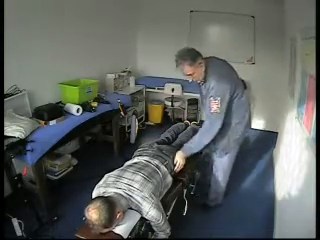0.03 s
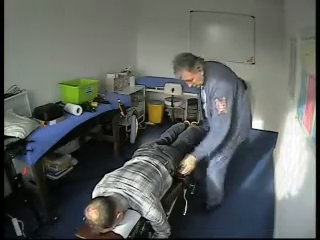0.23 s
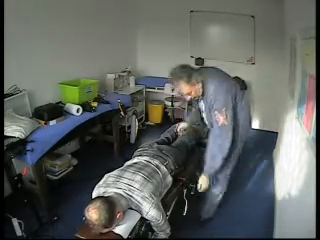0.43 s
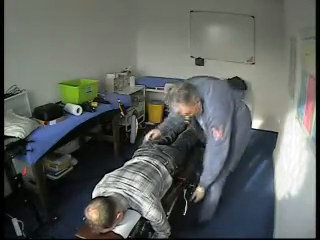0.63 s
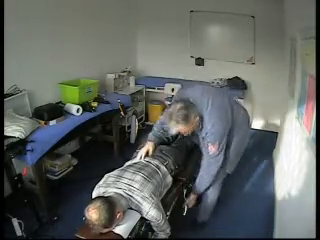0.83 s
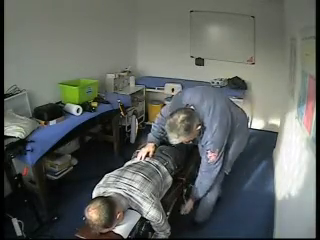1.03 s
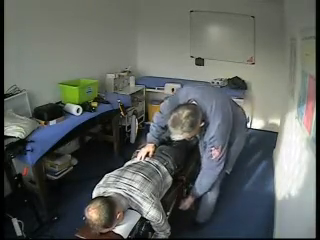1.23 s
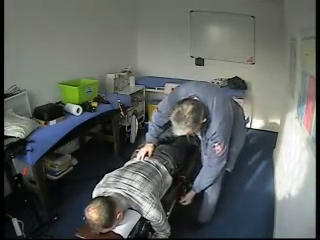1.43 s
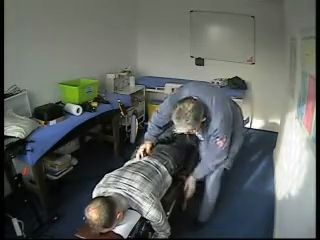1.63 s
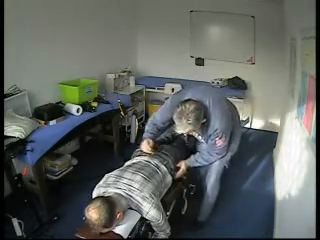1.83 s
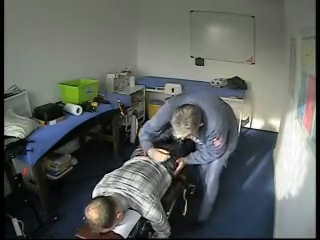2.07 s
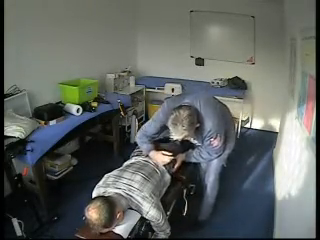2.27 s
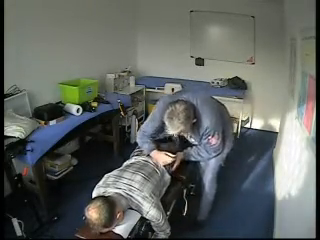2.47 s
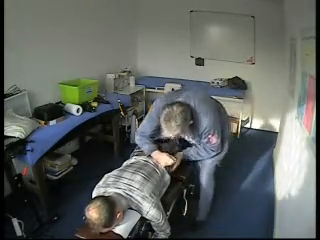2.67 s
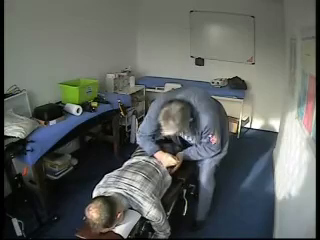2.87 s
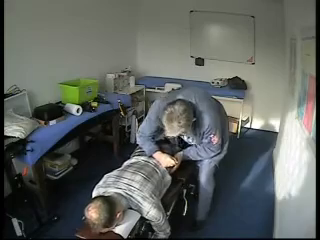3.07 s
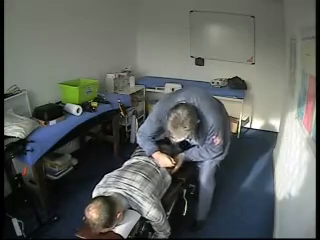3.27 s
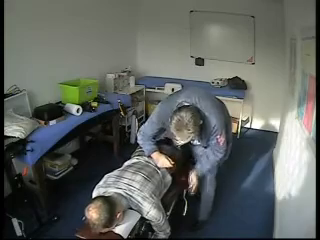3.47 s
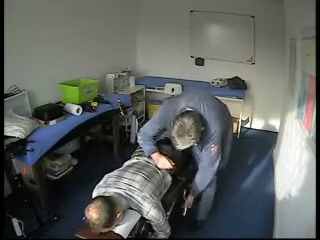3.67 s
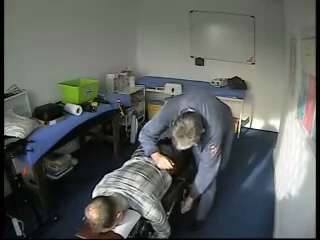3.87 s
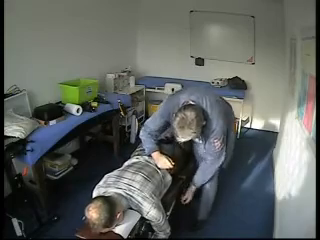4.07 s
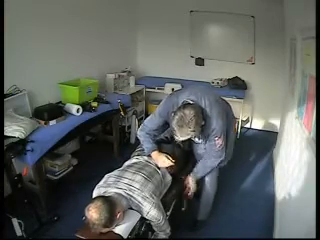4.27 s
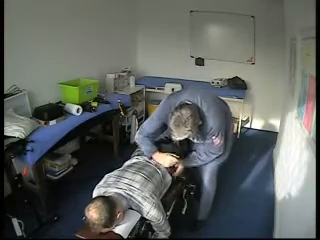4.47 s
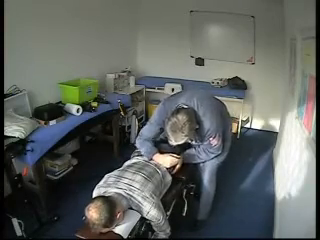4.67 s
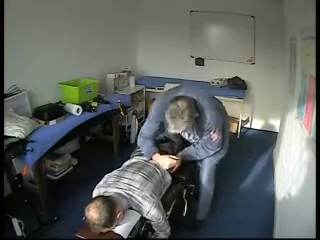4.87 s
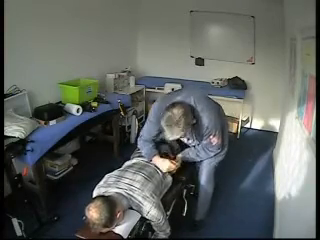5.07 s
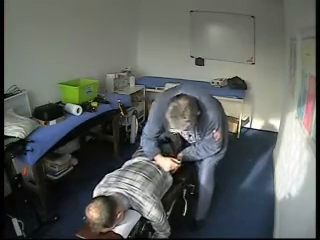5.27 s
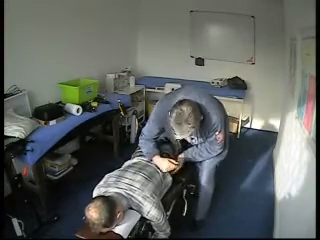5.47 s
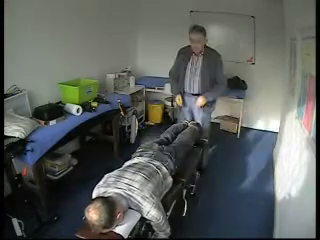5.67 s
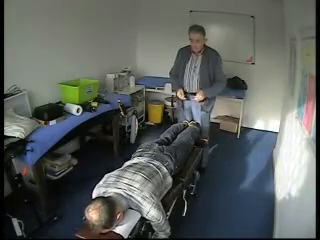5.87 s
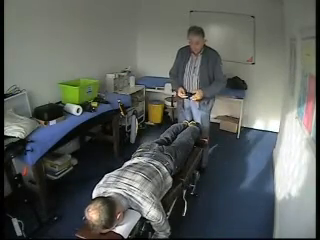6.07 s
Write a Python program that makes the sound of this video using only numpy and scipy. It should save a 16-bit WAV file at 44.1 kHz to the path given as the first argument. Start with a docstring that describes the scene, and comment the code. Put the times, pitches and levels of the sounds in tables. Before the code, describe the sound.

Steady soft hiss, low mains hum and a thin high whine in a small, lightly reverberant room. A treatment table's lever clacks into place, swings back and knocks in quickening, weakening bounces, then a push slams the padded section onto its stop with a hard rattling crack. The whole cycle repeats. Cloth rustles and small fittings tick between. Distant, band-limited microphone whose level ducks after each slam.

```python
"""Steady hiss, mains hum and a thin whine, then a drop-section treatment table worked twice in a small room.
A lever cocks the section with a clack, swings back and bounces; a push drops the section onto its stop,
where it slams and rattles. Knocks are dying clusters of contacts, coloured by the part struck, plus decaying
modes and room reflections; fittings tick, and filtered noise makes the cloth. A limiter ducks the slams."""
import sys
import numpy as np
from scipy import signal
from scipy.fft import rfft, irfft, next_fast_len
from scipy.io import wavfile
from scipy.ndimage import uniform_filter1d

SR = 44100
rng = np.random.default_rng(int(sys.argv[2]) if len(sys.argv) > 2 else 0)


def log_audio(samples):
    """Write samples as a 16-bit WAV file to the path given in sys.argv[1]."""
    # one column per channel
    frames = np.atleast_2d(samples).T
    # limit to full scale, then quantise
    limited = np.clip(frames, -1, 1)
    pcm = np.round(limited * 32767).astype(np.int16)
    wavfile.write(sys.argv[1], SR, pcm)


N = 269583

SIZE = 32768  # samples in one blow
T, HZ = np.arange(SIZE) / SR, np.fft.rfftfreq(SIZE, 1 / SR)


def amp(db):
    """Decibels to gain."""
    return 10 ** (np.asarray(db) / 20)


def read(points, hz):
    """Interpolates a table linearly over log frequency."""
    point_hz, value = np.transpose(points)
    return np.interp(np.log(hz + 1), np.log(point_hz), value)


def unit(x):
    """Scales to an energy of one."""
    return x / np.linalg.norm(x)


def add(mix, s, sound):
    """Mixes a sound in at time s, cut off at the end of the mix."""
    part = mix[round(s * SR):][:len(sound)]
    part += sound[:len(part)]


def causal(db):
    """Minimum-phase response with this gain: nothing sounds before its cause."""
    log_gain = np.log(amp(np.maximum(db, -100)))
    circle = np.concatenate([log_gain, log_gain[-2:0:-1]])
    return np.exp(np.conj(signal.hilbert(circle)))[:len(db)]


def levelled(x, size):
    """Spectrum of x with broad humps evened out over size bins; the fine ripple stays."""
    z = rfft(x)
    smooth_power = uniform_filter1d(abs(z) ** 2, size)
    return z * causal(-10 * np.log10(smooth_power + 1e-12))


def noise(spectrum):
    """Gaussian noise of rms one with the given spectrum."""
    gain = amp(read(spectrum, np.fft.rfftfreq(N, 1 / SR)))
    z = rfft(rng.standard_normal(N)) * gain
    return unit(irfft(z, N)) * np.sqrt(N)


def chatter(length_s, first=0.45, rise_s=0.00024, grain=0.32):
    """Spectrum of a first contact plus a cluster of uneven ones that builds up and dies away."""
    sign, spread = rng.standard_normal((2, SIZE))
    decay = np.exp(grain * spread - T / max(length_s, 1e-4))
    contacts = unit(sign * decay * (1 - np.exp(-T / rise_s)))
    contacts[0] += first
    return levelled(contacts, size=300)


def room(build_s=0.0037):
    """Spectrum of the reflections: they build up in milliseconds and each band dies at its own speed."""
    # Each row: frequency in Hz, 60 dB decay time in seconds.
    room_t60 = [(60, 0.56), (150, 0.33), (400, 0.58), (900, 0.45), (1800, 0.49), (3500, 0.38), (6000, 0.33),
                (10000, 0.15)]
    hz, t, z = signal.stft(rng.standard_normal(SIZE), SR, nperseg=256)
    decay_db = -60 * t / read(room_t60, hz)[:, None]
    tail = signal.istft(z * amp(decay_db), SR, nperseg=256)[1][:SIZE]
    return levelled(tail * (1 - np.exp(-(T / build_s) ** 2)), size=200)


def blows(rows, colour, modes, bass_hz, treble_hz, first, rise_s, grain, uneven_db):
    """Each blow chatters into the struck part and the room, and rings the modes; bass and treble tilt it."""
    rings = np.array([amp(db - 60 * T / t60) * np.sin(2 * np.pi * hz * T) for hz, db, t60 in modes])
    body, out = causal(read(colour, HZ)), np.zeros(N)
    bass = 1 / (1 + (HZ / bass_hz) ** 4)
    treble = 1 - 1 / (1 + (HZ / treble_hz) ** 4)
    for s, force_db, bass_db, treble_db, length_s, room_db in rows:
        force = causal(force_db + bass_db * bass + treble_db * treble)
        knock = chatter(length_s, first, rise_s, grain) * body * (1 + amp(room_db) * room())
        mode_gain = amp(uneven_db * rng.standard_normal(len(modes)))  # where it lands decides which speak
        ring = rfft(mode_gain @ rings)
        add(out, s, irfft(force * (knock + ring)))
    return out


def background(hiss_db=-73, apart_db=-88, right_hum_db=-3.5, whine_db=-83.5, right_whine_db=-4, buzz=0.53):
    """Hiss, mostly common to both channels, plus mains hum and a whine that pulses at the mains rate."""
    # Mains hum. Each row: frequency in Hz, left-channel rms level in dB.
    hum_tones = [(49.94, -59.5), (99.9, -97.5), (149.8, -99), (249.7, -87.5), (349.6, -86.5)]
    # Hiss spectrum. Each row: frequency in Hz, relative density in dB per Hz.
    hiss_spectrum = [(25, -18.5), (80, 9), (140, -1.5), (260, 4), (500, -4.5), (1000, -8), (2000, -15.5),
                     (4000, -19), (5700, -21), (6600, -17.5), (9000, -24), (10400, -19.5), (12000, -35.5)]
    whine_hz = 6424.4
    t = np.arange(N) / SR
    hum = sum(np.sqrt(2) * amp(db) * np.sin(2 * np.pi * (hz * t + rng.random())) for hz, db in hum_tones)
    throb = 1 + buzz * np.sin(2 * np.pi * hum_tones[0][0] * t)
    whine = np.sqrt(2) * amp(whine_db) * throb * np.sin(2 * np.pi * whine_hz * t)
    apart = amp(apart_db) * np.array([noise(hiss_spectrum), noise(hiss_spectrum)])
    right_tones = amp(right_hum_db) * hum + amp(right_whine_db) * whine
    tones = np.array([hum + whine, right_tones])
    return amp(hiss_db) * noise(hiss_spectrum) + apart + tones


def clothes(rest_db=-79, grain_db=0.66):
    """Cloth rubs in small uneven catches, swelling and fading with each stroke over a faint steady rub."""
    # Sleeves and trousers rub with each reach and push.
    # Each row: middle in seconds, half length in seconds (power down to 1/e), peak level in dB.
    strokes = [(0.632, 0.12, -68), (1.656, .045, -63), (2.596, 0.2, -66), (2.886, 0.078, -55.5),
               (3.504, 0.31, -75.5), (4.323, 0.28, -67), (5.11, 0.097, -65.5), (5.443, 0.066, -69),
               (6.062, 0.059, -87.5)]
    # Cloth spectrum. Each row: frequency in Hz, relative density in dB per Hz.
    cloth_spectrum = [(80, -5.5), (250, -2), (500, -6), (1000, -11.5), (2500, -16.5), (5000, -25),
                      (10000, -29.5), (12000, -41)]
    t = np.arange(N) / SR
    swells = sum(amp(db) ** 2 * np.exp(-((t - s) / half_s) ** 2) for s, half_s, db in strokes)
    power = amp(rest_db) ** 2 + swells
    catches = unit(uniform_filter1d(rng.standard_normal(N), size=300)) * np.sqrt(N)
    return noise(cloth_spectrum) * np.sqrt(power) * amp(grain_db * catches)


def section(bump_bass_db=0.0, bump_treble_db=-3.5, bump_room_db=-8):
    """The section slams and rattles at each drop; soft bumps sound through the same frame."""
    # A push drops the section onto its stop.
    # Each row: start in seconds, force in dB, treble in dB, room in dB.
    drops = [(2.8067, -1.5, -0.5, -11.5), (5.1063, -0.5, 4, -13.5)]
    # Course of every drop: catch slips, crack, thud of the load, rebounds, last rattles.
    # Each row: delay in seconds, force in dB, bass in dB, treble in dB, chatter time in seconds;
    # force and treble add to those of the drop.
    course = [(-0.0095, -5.5, -0.5, 7, 0.016), (0, 16, -4.5, 3, 0.0015), (0.0027, 15, 4.5, 4, 0.0067),
              (0.0194, 10.5, -1, 5, 0.00091), (0.025, 5.5, -1, 6.5, 0.0016), (0.0302, 15, 0.5, 1.5, 0.002),
              (0.039, 4, 3, -3.5, 0.005), (0.0688, 4.5, -2, -2, 0.0018), (0.0939, 4, -12, -8, 0.0033)]
    # The frame creaks and bumps under shifting weight; the first row is a soft bump already dying away as the
    # scene opens. # Each row: start in seconds, force in dB, chatter time in seconds.
    bumps = [(0.018, -19.5, 0.052), (2.779, -5, 0.018), (3.087, -24.5, 0.003), (5.611, -22.5, 0.029)]
    # Spectrum of a blow on the section. Each row: frequency in Hz, gain in dB.
    drop_colour = [(30, -9.5), (65, 2.5), (105, -2), (160, 6.5), (250, 3), (450, 6.5), (600, -3),
                   (800, -2.5), (1500, -5.5), (2600, -11.5), (3700, -12), (5000, -19.5), (10000, -31),
                   (12000, -40)]
    # Ringing of the table frame. Each row: frequency in Hz, level in dB, 60 dB decay time in seconds.
    frame_modes = [(64, -70, 0.64), (72.1, -60, 0.75), (145.5, -55, 0.28), (205.2, -66, 0.43),
                   (386, -65.5, 0.51), (409, -61.5, 0.5), (450.5, -50, 0.26), (724, -73.5, 0.38),
                   (726, -66.5, 0.41), (756, -65.5, 0.37), (1134, -69.5, 0.25), (1466, -66, 0.72),
                   (1650, -76, .3), (1858, -67, 0.313), (3510, -61.5, .15), (3675, -65.5, 0.16)]
    rows = []
    for s, drop_db, edge_db, room_db in drops:
        for delay_s, db, bass_db, treble_db, length_s in course:
            rows.append((s + delay_s, drop_db + db, bass_db, edge_db + treble_db, length_s, room_db))
    for s, db, length_s in bumps:
        rows.append((s, db, bump_bass_db, bump_treble_db, length_s, bump_room_db))
    return blows(rows, drop_colour, frame_modes, bass_hz=612, treble_hz=2770,
                 first=0.26, rise_s=0.00093, grain=0.82, uneven_db=2.3)


def hump(hz, octaves):
    """A bell over log frequency: one at its centre, half at this many octaves to either side."""
    return 1 / (1 + (np.log2((HZ + 1) / hz) / octaves) ** 2)


def ticks(skirt_db=36, dull_hz=8000, length_s=0.0032, room_db=-7):
    """Fittings tick: short contacts, each centred on one pitch."""
    # Each row: start in seconds, level in dB, pitch in Hz, half the bell's half-height distance in octaves.
    tick_rows = [(0.283, -31.5, 2060, 0.41), (.643, -21.5, 980, 0.76), (1.0365, -19.5, 4660, 0.65),
                 (1.128, -20, 4970, 0.23), (1.291, -28.5, 4170, 0.71), (1.325, -29, 4800, 0.92),
                 (1.3335, -15, 2330, 0.32), (1.510, -17, 1140, 0.94), (1.609, -19, 1040, 1.08),
                 (2.642, -6.5, 472, 0.68), (2.754, -17.5, 1190, 0.88), (3.548, -31, 2380, 0.26),
                 (3.787, -20, 3430, 0.3), (4.013, -27, 3660, 1.9), (4.0431, 7, 896, 0.32),
                 (4.0415, -6.5, 6420, 0.13), (4.2454, -20, 3880, 0.47), (4.247, -11, 955, 0.64),
                 (4.307, -20, 1870, 0.41)]
    out = np.zeros(N)
    soft_db = -20 * np.log10(1 + (HZ / dull_hz) ** 4)
    for s, db, hz, octaves in tick_rows:
        colour = causal(db + soft_db - skirt_db * (1 - hump(hz, 2 * octaves)))
        add(out, s, irfft(chatter(length_s) * colour * (1 + amp(room_db) * room())))
    return out


def latch():
    """The lever lifts and latches the section: firm blows clack briefly, soft ones chatter for longer."""
    # Each row: start in seconds, force in dB, bass in dB, treble in dB, room in dB.
    latches = [(1.0506, 3.5, -1, 2, 1.5), (1.3104, -10, 11.5, 1.5, 1), (1.3332, 1.5, -4.5, -17.5, -0.5),
               (1.502, -15.5, 12.5, 2, -0.5), (3.776, -20, 3, 5, 6), (3.788, -18.5, 8, 3.5, 1.5),
               (3.851, -17, 9, -16, -5), (4.0256, -4.5, 8.5, -1, 3.5), (4.0408, 6, -5.5, 1.5, -4),
               (4.2017, -15, 9, 6, -0.5)]
    # Spectrum of a latch blow. Each row: frequency in Hz, gain in dB.
    latch_colour = [(50, -10.5), (110, -4), (200, 2.5), (450, 0.5), (650, -7.5), (1150, -7), (1700, -4),
                    (2400, -17.5), (4000, -20), (6500, -33), (10000, -35.5), (12000, -55)]
    # Ringing of the latch. Each row: frequency in Hz, level in dB, 60 dB decay time in seconds.
    latch_modes = [(213.3, -59, 0.39), (331, -53, 0.46), (415, -46.5, 0.27), (836, -57, 0.44),
                   (1130, -40, 0.043), (1427, -56.5, 0.51), (1635, -50, 0.27), (1800, -65, 0.22),
                   (2170, -69, 0.62), (3240, -52, 0.045)]
    chatter_s, firming = 0.0023, 0.39  # time at 0 dB force; dB of time lost per dB of force
    rows = []
    for s, db, bass_db, treble_db, room_db in latches:
        length_s = chatter_s * amp(-firming * db)
        rows.append((s, db, bass_db, treble_db, length_s, room_db))
    return blows(rows, latch_colour, latch_modes, bass_hz=580, treble_hz=2820,
                 first=0.23, rise_s=0.0018, grain=0.61, uneven_db=0.3)


def lever(count=4, bass_db=0.5, bass_gain_db=1.1, treble_db=3.5, play_treble_db=1.0,
          landing_s=0.013, rattle_s=0.013, room_db=-1.0):
    """The lever bounces like a ball: each flight is shorter, each landing weaker and more of a thud."""
    # The freed lever swings back and lands. Each row: first landing in seconds, force in dB.
    swings = [(1.7554, -3), (4.393, -3)]
    # Spectrum of a landing. Each row: frequency in Hz, gain in dB.
    bounce_colour = [(50, -5.5), (100, -8.5), (160, 4), (240, 2), (400, 10), (580, -7), (950, -5),
                     (1600, -10.5), (2400, -16.5), (3500, -16), (5000, -24.5), (10000, -35.5), (12000, -49)]
    # Ringing of the lever. Each row: frequency in Hz, level in dB, 60 dB decay time in seconds.
    lever_modes = [(64.9, -60, 1), (157, -58, 0.18), (202.7, -59.5, 0.293), (288, -61.5, .25),
                   (334, -58.5, .25), (369, -59.5, 0.24), (415, -59, 0.45), (475, -63.5, .25),
                   (880, -57.5, 0.24), (3400, -60, 0.17)]
    flight_s, restitution = 0.246, 0.675  # first flight; ratio of each flight to the one before
    bounce_loss_db, loss_growth = 3.5, 1.75  # loss at the first bounce; exponent of its growth
    play_s = 0.017  # the loose joint knocks again this long after each landing
    rows = []
    for s, force_db in swings:
        for k in range(count):
            db = force_db - bounce_loss_db * k ** loss_growth
            thud_db = bass_db + bass_gain_db * k
            rows.append((s, db, thud_db, treble_db, landing_s, room_db))
            rows.append((s + play_s, db, thud_db, play_treble_db, rattle_s, room_db))
            s += flight_s * restitution ** k
    return blows(rows, bounce_colour, lever_modes, bass_hz=520, treble_hz=2724,
                 first=0.2, rise_s=0.0022, grain=0.94, uneven_db=0.5)


def ports(x, corner_hz=145):
    """Two channels agree in the treble; the left rolls off in the bass, so there it is weaker and leads."""
    size = next_fast_len(N + SIZE)
    hz = np.fft.rfftfreq(size, 1 / SR)
    left = 1j * hz / (corner_hz + 1j * hz)
    pair = np.array([left, np.ones(len(hz))])
    return irfft(rfft(x, size) * pair / pair.mean(0), size)[:, :N]  # the channel mean stays x


def limiter(x, threshold_db=-23.5, attack_s=0.0017, recovery_db_per_s=60):
    """Turns the gain down within milliseconds of a slam and lets it creep back during the tail."""
    keep = np.exp(-1 / (attack_s * SR))
    power = signal.lfilter([1 - keep], [1, -keep], (x ** 2).mean(0))
    power_db = 10 * np.log10(power + 1e-12)
    fall_db = recovery_db_per_s * np.arange(N) / SR
    held_db = np.maximum.accumulate(power_db + fall_db) - fall_db  # peak hold, falling steadily
    over_db = np.maximum(held_db - threshold_db, 0)
    cut_db = signal.lfilter(np.ones(64) / 64, 1, over_db)
    return x * amp(-cut_db)


def scene():
    """The table and the people at it, over the steady background."""
    return ports(latch() + lever() + section() + ticks() + clothes()) + background()


def record(dry, ceiling_db=-13.5):
    """The limiter ducks the slams, a soft clip rounds the peaks it lets through, a low-pass limits the band."""
    edge_hz = 11500
    squashed = amp(ceiling_db) * np.tanh(limiter(dry) / amp(ceiling_db))
    low_pass = signal.firwin(101, edge_hz, window=("kaiser", 7), fs=SR)
    return signal.oaconvolve(squashed, low_pass[None], "same")


dry = scene()
out = record(dry)
log_audio(out)
```